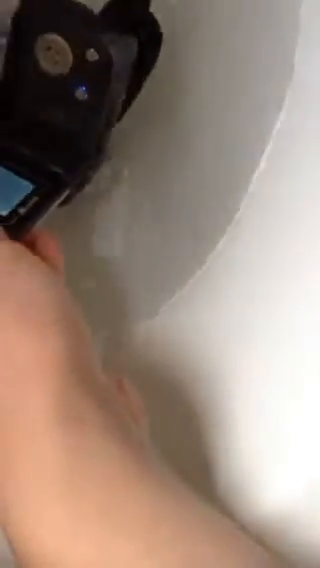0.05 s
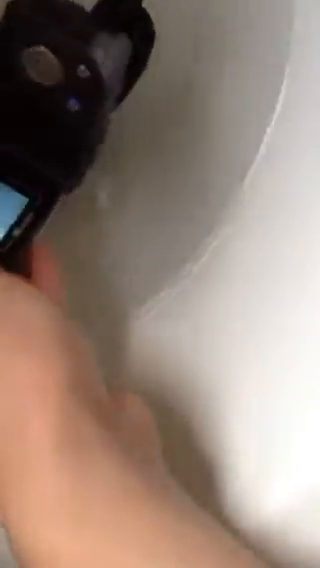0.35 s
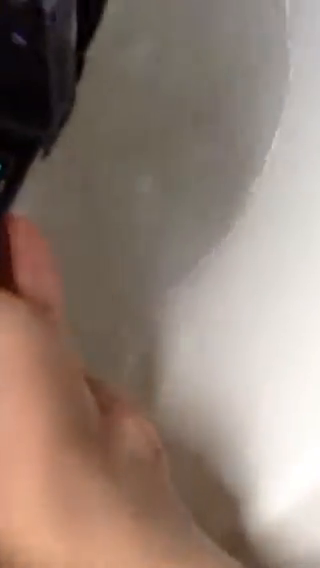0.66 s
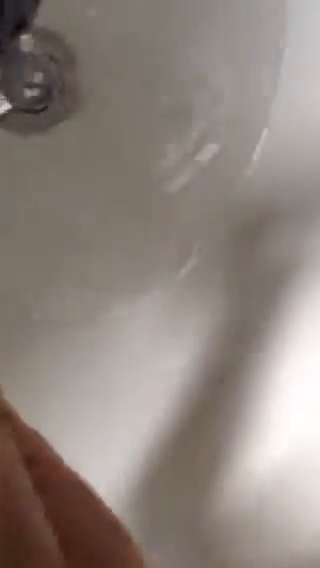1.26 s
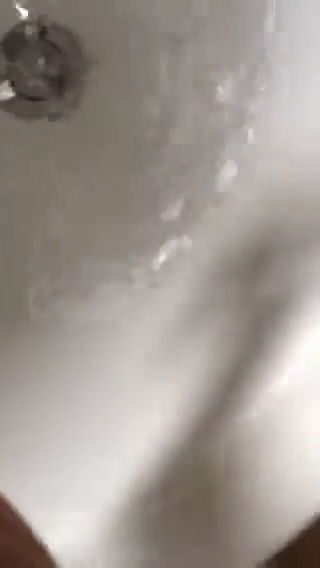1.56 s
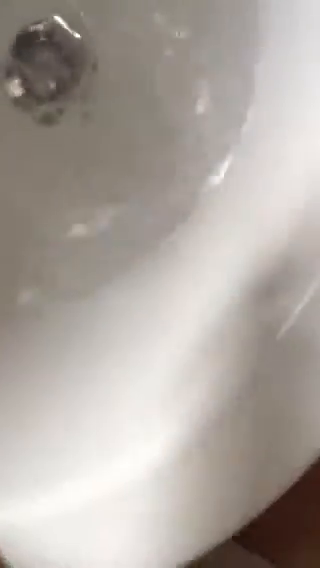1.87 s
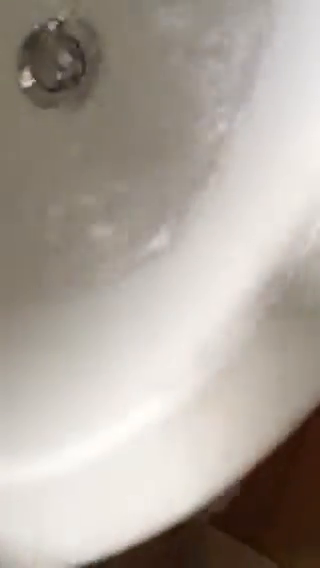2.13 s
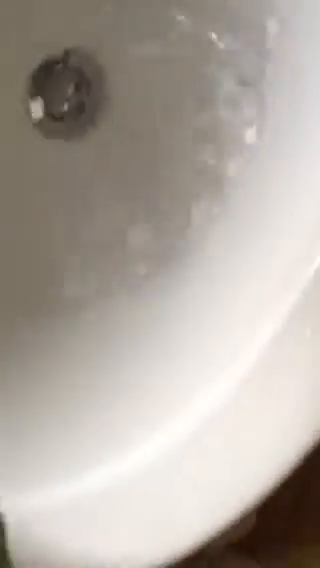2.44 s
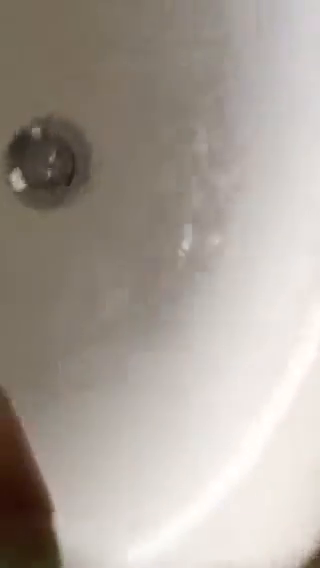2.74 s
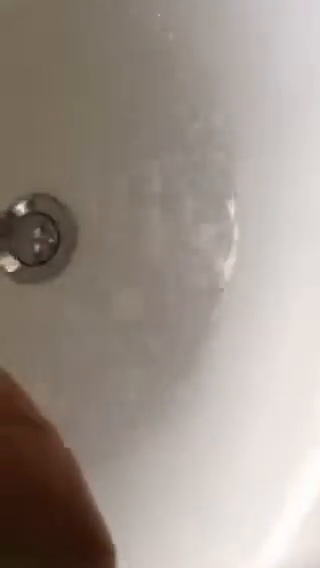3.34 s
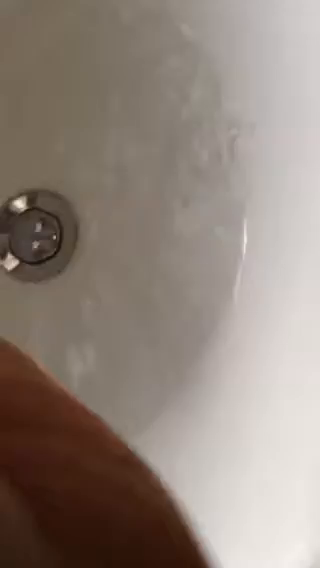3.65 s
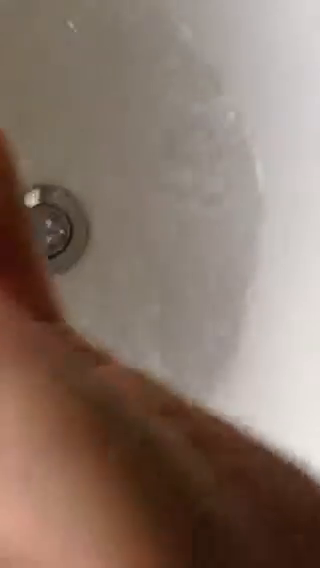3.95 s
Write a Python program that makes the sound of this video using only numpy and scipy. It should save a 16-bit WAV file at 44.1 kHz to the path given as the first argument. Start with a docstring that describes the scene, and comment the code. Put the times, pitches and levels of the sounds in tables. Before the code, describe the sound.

Close, irregular drips and light splashes fall into a partly filled washbasin after one soft knock against the bowl. The trickle gets busier, then eases to scattered drops, with a short bathroom echo and faint hiss.

```python
"""A small hard bathroom: a wet object knocks against a washbasin, touches it faintly twice and is lifted.
Water runs off it and off the hand into shallow water. Drops trap air bubbles that ring, some gliding up
as they surface, and fine spray ticks on water and glaze. The room rings after each sound, over a faint
hum, hiss and a soft hollow rush that comes and goes."""
import sys
import numpy as np
from scipy import signal
from scipy.fft import rfft, irfft
from scipy.io import wavfile

SR = 44100
rng = np.random.default_rng(int(sys.argv[2]) if len(sys.argv) > 2 else 0)


def to_wav(s):
    """Save 16-bit WAV."""
    ch = np.atleast_2d(s).T  # columns
    pcm = np.round(np.clip(ch, -1, 1) * 32767)  # PCM
    wavfile.write(sys.argv[1], SR, pcm.astype(np.int16))


N = 176400


def amp(db):
    """Decibels to gain."""
    return 10 ** (np.asarray(db) / 20)


def unit_rms(x):
    """Scale to rms 1."""
    return x / np.sqrt(np.mean(x ** 2) + 1e-20)


def seconds(length_s):
    """Time axis."""
    return np.arange(int(length_s * SR)) / SR


def add(out, start_s, sound):
    """Mix a sound in at start_s."""
    i = int(np.clip(start_s * SR, 0, N - 1))
    out[i:i + len(sound)] += sound[:N - i]


def filtered(x, hz, kind, order=2):
    """Butterworth filter."""
    sos = signal.butter(order, np.clip(hz, 10, .45 * SR), kind, fs=SR, output="sos")
    return signal.sosfilt(sos, x)


def at_hz(rows, hz, column=1):
    """Interpolate a table column over log frequency."""
    table = np.array(rows)
    return np.interp(np.log(hz), np.log(table[:, 0]), table[:, column])


def shaped_noise(spectrum):
    """Steady noise with this amplitude spectrum, rms 1."""
    return unit_rms(irfft(rfft(rng.standard_normal(N)) * spectrum, N))


def burst(decay_ms, hz, kind, order=2):
    """Filtered noise with exponential decay."""
    t = seconds(.1)
    noise = filtered(rng.standard_normal(2 * len(t)), hz, kind, order)[len(t):]
    return unit_rms(noise) * np.exp(-1000 * t / decay_ms)


def bubble(hz, ring_ms, rise_oct, wobble=0):
    """Trapped air rings up within a cycle; its pitch holds, then climbs as it nears the surface."""
    onset_cycles, surfacing_age = 0.5, 0.852
    t = seconds(.1)
    age = 1000 * t / ring_ms
    surfaced = 1 - np.exp(-(age / surfacing_age) ** 2.35)
    pitch_hz = hz * 2 ** (rise_oct * surfaced) * (1 + wobble)
    onset = 1 - np.exp(-(t * hz / onset_cycles) ** 2)
    return np.sin(2 * np.pi * np.cumsum(pitch_hz) / SR) * onset * np.exp(-age ** 1.25)


# hiss spectrum: freq_hz, density_db
HISS_SPECTRUM = [(29, -40), (50, -15.5), (218, -1), (300, -6), (480, -6), (750, -11.5), (1500, -14),
                 (2950, -19), (4350, -18), (7570, -18), (14900, -18), (16000, -48)]
# hum: pitch_hz, level_db
HUM_LINES = [(156, -73.5)]


def hiss_and_hum():
    """Steady hiss and a low hum of narrow, wavering noise."""
    hiss_db, half_width_hz = -64, 2.7
    hz = np.maximum(np.fft.rfftfreq(N, 1 / SR), 1)
    out = amp(hiss_db) * shaped_noise(amp(at_hz(HISS_SPECTRUM, hz)))
    for pitch_hz, level_db in HUM_LINES:
        out += amp(level_db) * shaped_noise(1 / (1 + ((hz - pitch_hz) / half_width_hz) ** 2))
    return out


# swells of the rush: start_s, length_s, level_db
RUSH_SWELLS = [(1.488, 0.51, -66), (1.84, 0.5, -62), (3.6, 0.49, -60.5)]
# its resonances, near the basin's strongest: centre_hz, level_db
RUSH_MODES = [(445, 2.5), (520, -1), (595, -3.5)]


def hollow_rush():
    """Soft noise in three low resonances swells and fades."""
    half_width_hz = 62
    hz, t = np.fft.rfftfreq(N, 1 / SR), np.arange(N) / SR
    spectrum = sum(amp(db) / (1 + ((hz - centre_hz) / half_width_hz) ** 2)
                   for centre_hz, db in RUSH_MODES)
    envelope = sum(amp(db) * np.sin(np.pi * np.clip((t - start_s) / length_s, 0, 1))
                   for start_s, length_s, db in RUSH_SWELLS)
    return envelope * shaped_noise(spectrum)


# reflections off the bowl: delay_ms, level_db
BOWL_ECHOES = [(2.3, -22), (3.9, -18.5), (6.7, -14)]
# room tail: freq_hz, level_db, t60_s
ROOM_TAIL = [(196, -6, 0.9), (484, -5, 0.49), (950, -5.5, 0.43), (2040, -7, 0.33), (3950, -5, 0.32),
             (8250, -6.5, 0.3), (14500, -3.5, 0.32)]


def bathroom(x):
    """Quick reflections inside the bowl, then the room's tail, shorter in the treble."""
    scatter_db, scatter_ms = -7, 6
    t = seconds(.7)
    scatter = rng.standard_normal(len(t)) * np.exp(-1000 * t / scatter_ms) * (t > .001)
    response = amp(scatter_db) * scatter / np.linalg.norm(scatter)
    for delay_ms, level_db in BOWL_ECHOES:
        response[int(delay_ms * SR / 1000)] += amp(level_db)
    onset = np.clip(t / 0.005 - .5, 0, 1)
    edges_hz = np.geomspace(100, 18000, 13)
    for low_hz, high_hz in zip(edges_hz, edges_hz[1:]):
        centre_hz = np.sqrt(low_hz * high_hz)
        envelope = onset * amp(-60 * t / at_hz(ROOM_TAIL, centre_hz, column=2))
        noise = filtered(rng.standard_normal(len(t)), [low_hz, high_hz], "band")
        response += amp(at_hz(ROOM_TAIL, centre_hz)) * noise * envelope / np.linalg.norm(envelope)
    return signal.fftconvolve(x, response)[:N]


# basin modes: pitch_hz, level_db, t60_s
BASIN_MODES = [(216, -2.5, 0.39), (289, -21, 0.31), (384, -7, 0.22), (447, 0, 0.11), (522, -2.5, 0.38),
               (599, 0.5, 0.11), (835, -20, 0.45), (927, -7, 0.39), (1112, -9, 0.15), (3160, 1, 0.015)]
# object on basin, harder is brighter: start_s, level_db, lowpass_hz
CONTACTS = [(0.031, -35, 12900), (0.549, -65, 5000), (2.648, -53, 218)]


def knocks():
    """The object strikes the basin: crack, thud and ring of the bowl; a soft contact is dull."""
    out, t = np.zeros(N), seconds(1)
    ring = sum((-1) ** k * amp(db - 60 * t / t60_s) * np.sin(2 * np.pi * hz * t)
               for k, (hz, db, t60_s) in enumerate(BASIN_MODES))
    for start_s, level_db, lowpass_hz in CONTACTS:
        crack = amp(-1) * burst(decay_ms=5, hz=(260, 4840), kind="band")
        thud = amp(0.5) * burst(decay_ms=32, hz=(259, 996), kind="band", order=5)
        for part in (ring, crack + thud):
            add(out, start_s, amp(level_db) * filtered(part, lowpass_hz, "low"))
    return out


# water running off: time_s, flow_db
RUNOFF_FLOW = [(0, -18), (.7, -17), (1.0, -0.5), (1.3, -10.5), (1.5, -2.5), (1.95, 0.5), (2.2, -7),
               (2.7, -3), (2.95, -11.5), (3.3, -12), (3.7, -8), (4, -11.5)]


def patter():
    """Faint stray droplets splat and chirp at random, denser and louder as more water runs off."""
    base_per_s, slots_per_s = 620, 1000
    base_db, spread_db = -58.5, 5
    low_hz, high_hz, ring_cycles, max_rise_oct = 2087, 14780, 8.8, 0.47
    out, flow_curve = np.zeros(N), np.transpose(RUNOFF_FLOW)
    splats = [amp(-6.5) * burst(decay_ms=1.28, hz=low_hz, kind="high") for _ in range(16)]
    for slot, (late, chance, size, pitch, glide) in enumerate(rng.random((slots_per_s * N // SR, 5))):
        start_s = (slot + late) / slots_per_s
        flow_db = np.interp(start_s, *flow_curve)
        if chance < base_per_s * amp(flow_db) / slots_per_s:
            pitch_hz = low_hz * (high_hz / low_hz) ** pitch
            level_db = base_db + flow_db + spread_db * min(-np.log(1 - size), 3)
            chirp = bubble(pitch_hz, 1000 * ring_cycles / pitch_hz, max_rise_oct * glide)
            add(out, start_s, amp(level_db) * (chirp + splats[slot % len(splats)]))
    return out


# fine droplets: start_s, pitch_hz, level_db
DROPLETS = [ (0.5484, 1850, -44.5), (0.7176, 7260, -46), (0.855, 11160, -43), (0.9585, 10500, -40.5),
            (0.98, 12000, -39), (1.045, 11500, -35.5), (1.073, 7640, -38.5), (1.114, 8200, -41.5),
            (1.1997, 9700, -29.5), (1.217, 6750, -38), (1.335, 11800, -44), (1.3825, 11900, -35),
            (1.462, 11850, -35.5), (1.4866, 8800, -38.5), (1.5139, 7830, -31), (1.517, 7600, -35),
            (1.5755, 10300, -33.5), (1.601, 10000, -40), (1.7044, 8600, -29), (1.744, 10630, -39),
            (1.7808, 12600, -32), (1.8465, 10600, -39.5), (1.8747, 8050, -36.5), (1.9077, 6870, -34.5),
            (1.973, 8650, -40), (2.2087, 10800, -40.5), (2.3668, 6000, -33), (2.5126, 12600, -40),
            (2.521, 6000, -41), (2.5592, 9600, -45.5), (2.637, 10250, -36), (2.701, 11100, -41.5),
            (2.738, 11000, -33.5), (2.827, 13400, -39.5), (2.9892, 7500, -39), (3.044, 4200, -49),
            (3.0768, 13900, -44), (3.0982, 7700, -42), (3.2089, 10600, -46), (3.262, 5650, -56),
            (3.325, 4200, -52.5), (3.7026, 11800, -41.5), (3.7035, 6600, -38), (3.779, 12170, -49.5)]


def spray():
    """Fine droplets tick: a bright splat, a tiny gliding bubble, a weaker splat on the rebound."""
    bubble_db, splat_db, rebound_db = 3, -4.5, -10.5
    max_rise_oct, max_rebound_s = 0.47, 0.0097
    out = np.zeros(N)
    for start_s, pitch_hz, level_db in DROPLETS:
        glide, late = rng.random(2)
        splat, rebound = (burst(decay_ms=2.14, hz=0.71 * pitch_hz, kind="high") for _ in range(2))
        chirp = bubble(pitch_hz, ring_ms=1.28, rise_oct=max_rise_oct * glide)
        add(out, start_s, amp(level_db) * (amp(bubble_db) * chirp + amp(splat_db) * splat))
        add(out, start_s + late * max_rebound_s, amp(level_db + rebound_db) * rebound)
    return out


def froth(drops):
    """Each drop tears off smaller, higher bubbles just after landing, louder as more water runs off."""
    per_drop, froth_db, ring_cycles = 6, -15.5, 6.5
    max_lag_s, max_above_oct, max_rise_oct = 0.036, 1.46, 0.61
    out = np.zeros(N)
    for start_s, drop_hz, level_db, _, _ in drops:
        flow_db = np.interp(start_s, *np.transpose(RUNOFF_FLOW))
        for late, smaller, strength, glide in rng.random((per_drop, 4)):
            pitch_hz = drop_hz * 2 ** (max_above_oct * smaller)
            gain = amp(level_db + froth_db + flow_db) * (.5 + strength)
            chirp = bubble(pitch_hz, 1000 * ring_cycles / pitch_hz, max_rise_oct * glide)
            add(out, start_s + late * max_lag_s, gain * chirp)
    return out


# drops and their bubbles: start_s, pitch_hz, level_db, ring_ms, rise_oct
DROPS = [ (0.804, 2170, -51, 5.3, 0.59), (0.843, 2966, -48, 6.6, 0), (0.97, 4980, -40, 2.7, 0),
         (0.983, 3810, -35.5, 1.8, 0.062), (1.005, 1767, -47, 12, 0.38), (1.017, 3930, -50.5, 11.5, 0.56),
         (1.045, 1430, -41, 4.7, 0.0072), (1.073, 1485, -43.5, 5.3, 0.016), (1.106, 2095, -27.5, 6, 0.059),
         (1.1047, 1403, -35, 5.4, 0.24), (1.168, 3740, -48, 1.9, 0.016), (1.2175, 1970, -31, 4.9, 0.01),
         (1.406, 1380, -45.5, 6.6, 0.45), (1.411, 1860, -40, 8.6, 0.19), (1.455, 2020, -35.5, 9.3, 0.55),
         (1.4533, 1284, -36, 5.5, 0), (1.4847, 1434, -36, 4.8, 0.069), (1.486, 3190, -42, 11, 0.5),
         (1.518, 2180, -30.5, 1.8, 0), (1.531, 1180, -37, 11.7, 0.056), (1.55, 1308, -39, 8.7, 0.27),
         (1.566, 1179, -43.5, 21, 0.72), (1.575, 1668, -34.5, 9.5, 0.82), (1.7068, 4230, -31.5, 2.9, 0),
         (1.76, 1386, -28, 11.5, 0.12), (1.775, 1427, -46, 17, 0.44), (1.836, 2640, -32.5, 2.5, 0.26),
         (1.842, 3250, -35.5, 5.2, 0), (1.853, 4050, -41.5, 8.9, 0.79), (1.9077, 2570, -35, 2.7, 0),
         (1.909, 1696, -37, 4.4, 0.037), (1.9828, 1372, -36.5, 13, 0), (2.2272, 918, -34, 11.4, 0.14),
         (2.2274, 1280, -36, 2.9, 0.089), (2.279, 901, -45.5, 34, 0), (2.2955, 2700, -30, 6.5, 0.093),
         (2.3182, 1520, -34, 4, 0.078), (2.332, 1600, -44, 8.2, .35), (2.316, 3285, -38, 7.2, 0.073),
         (2.3823, 2640, -36, 5, 0.52), (2.402, 1188, -35.5, 13.4, 0), (2.519, 2780, -42.5, 1.9, 0.036),
         (2.5602, 3290, -32.5, 2.24, 0.23), (2.6458, 3630, -29.5, 2.5, 0.17), (2.685, 1490, -43, 3.8, 0),
         (2.7017, 3490, -27, 3.4, 0.37), (2.7238, 1373, -38.5, 16.4, 0.093),
         (2.7373, 3350, -21.5, 2.5, 0.14), (2.738, 4140, -31.5, 3.6, 0.55), (2.783, 1934, -28.5, 3.3, 0),
         (2.791, 1958, -28.5, 6.4, 0.96), (2.799, 3696, -30.5, 6.3, 0.0073),
         (3.1088, 1076, -38.5, 12.4, 0.17), (3.3944, 1011, -37.5, 8, 0.4), (3.399, 1227, -36, 7.4, 0.046),
         (3.408, 896, -42, 10.3, 0.033), (3.434, 942, -48.5, 22.4, 0.94), (3.438, 2247, -40.5, 8.2, 1),
         (3.585, 958, -43.5, 21, 0), (3.616, 1054, -44, 14, 1), (3.657, 1917, -28, 7.3, 0.038),
         (3.664, 2008, -35, 10, 0.8)]


def drips():
    """Each drop slaps the surface and leaves a bubble whose pitch wavers in the moving water."""
    bubble_db, slap_db, slap_top_hz, gentle_above_ms = 2, -7.5, 7540, 4.5
    wobble_depth, wobble_hz = 0.029, 300
    out = np.zeros(N)
    for start_s, pitch_hz, level_db, ring_ms, rise_oct in DROPS:
        band_hz = [min(0.83 * pitch_hz, slap_top_hz / 2), slap_top_hz]
        softening = min(1, gentle_above_ms / ring_ms) ** 0.54  # long-ringing bubbles close gently
        slap = softening * burst(decay_ms=0.73, hz=band_hz, kind="band", order=3)
        wobble = wobble_depth * unit_rms(filtered(rng.standard_normal(len(slap)), wobble_hz, "low"))
        ring = bubble(pitch_hz, ring_ms, rise_oct, wobble)
        add(out, start_s, amp(level_db) * (amp(bubble_db) * ring + amp(slap_db) * slap))
    return filtered(out, hz=843, kind="high", order=3)


def scene():
    """Water and knocks with their reverberation, over the background; mono."""
    direct = drips() + froth(DROPS) + spray() + patter() + knocks()
    return (direct + bathroom(direct) + hollow_rush() + hiss_and_hum())[None]


def record(dry):
    """A small microphone loses the bass; the top is cut steeply."""
    highpass_hz, lowpass_hz = 163, 15500
    thin = filtered(dry, highpass_hz, "high", order=3)
    return signal.sosfilt(signal.ellip(10, .2, 70, lowpass_hz, fs=SR, output="sos"), thin)


dry = scene()
out = record(dry)
to_wav(out)
```